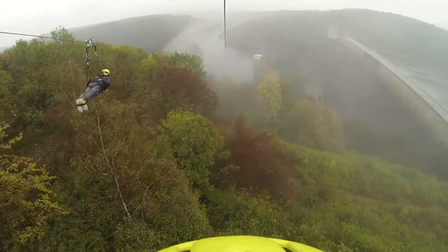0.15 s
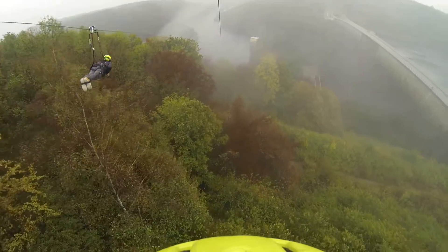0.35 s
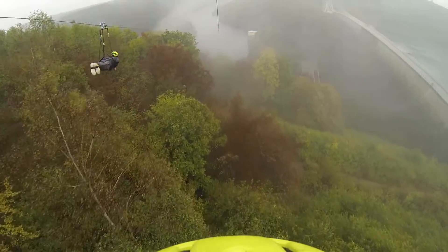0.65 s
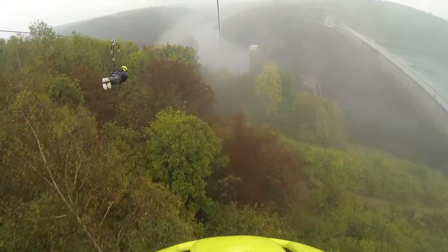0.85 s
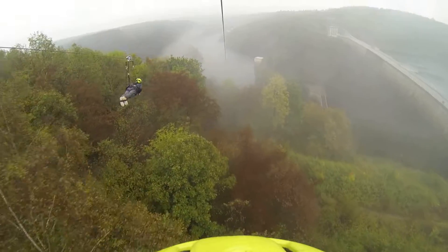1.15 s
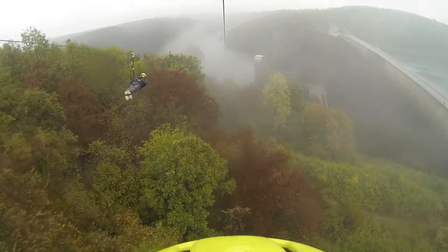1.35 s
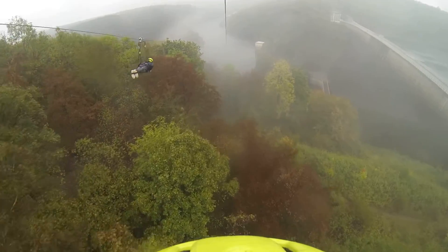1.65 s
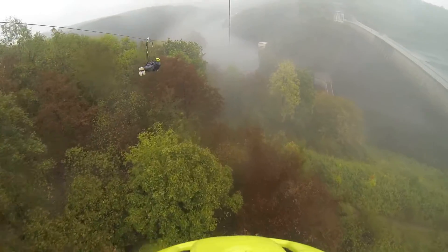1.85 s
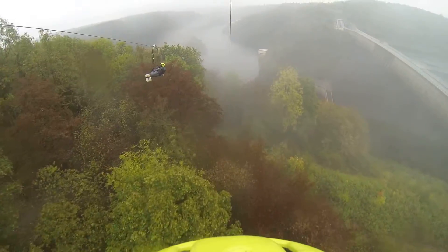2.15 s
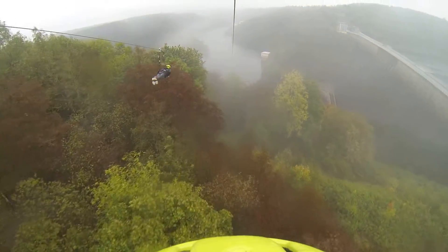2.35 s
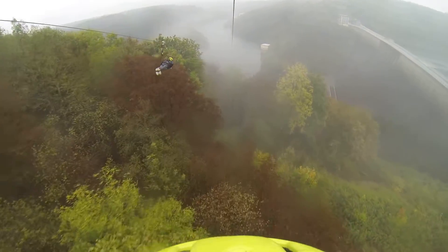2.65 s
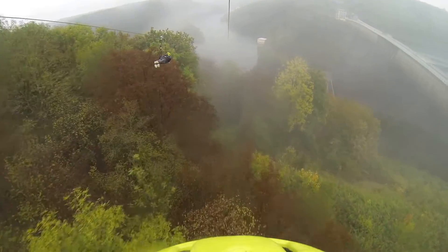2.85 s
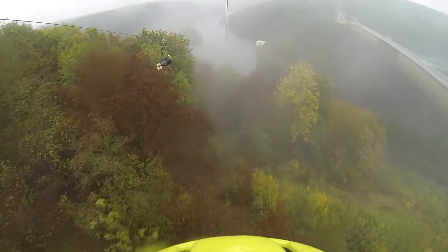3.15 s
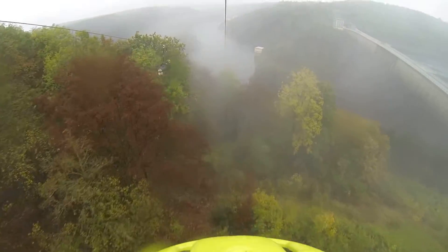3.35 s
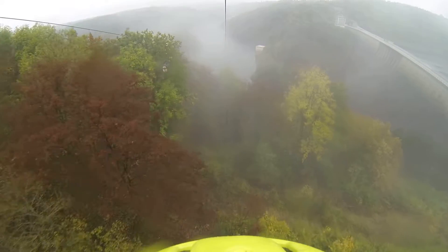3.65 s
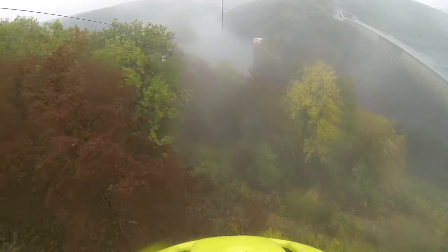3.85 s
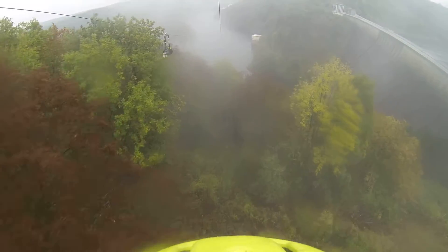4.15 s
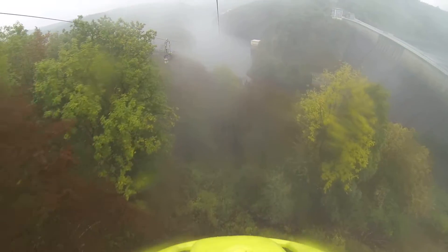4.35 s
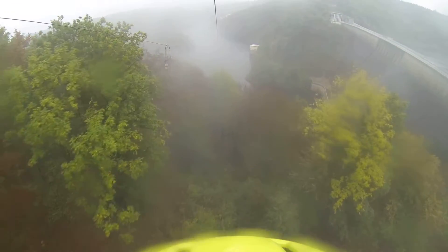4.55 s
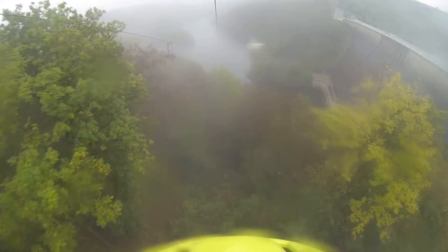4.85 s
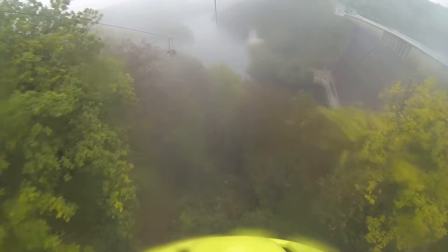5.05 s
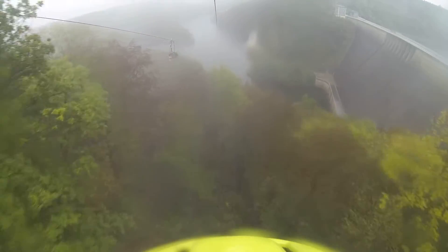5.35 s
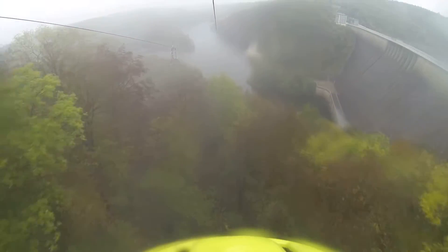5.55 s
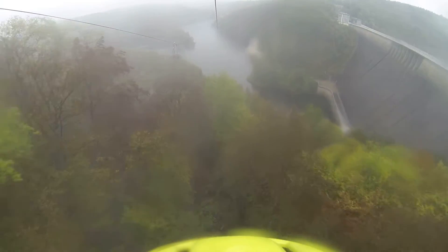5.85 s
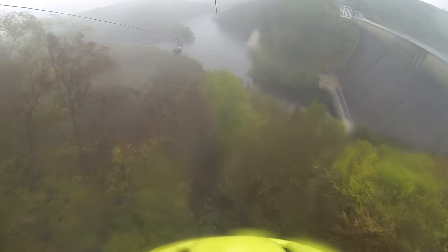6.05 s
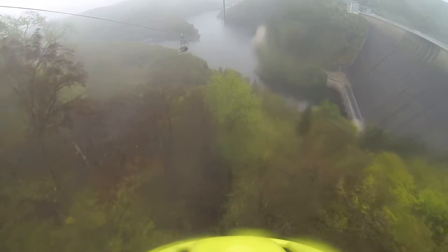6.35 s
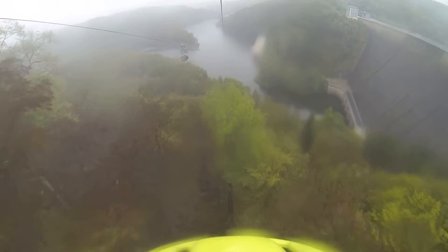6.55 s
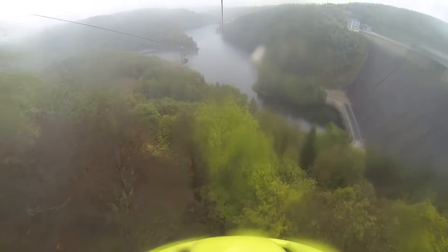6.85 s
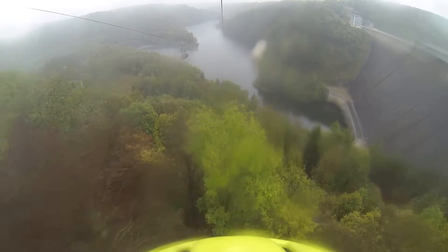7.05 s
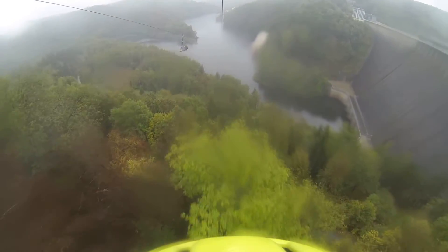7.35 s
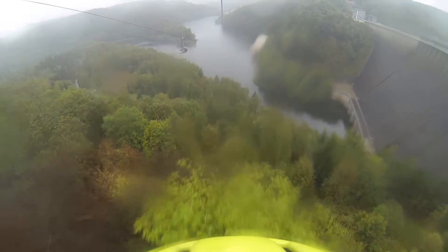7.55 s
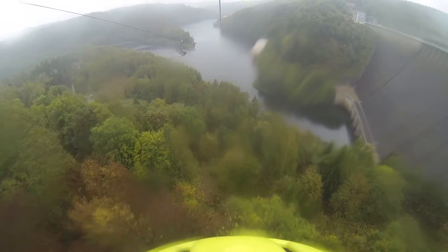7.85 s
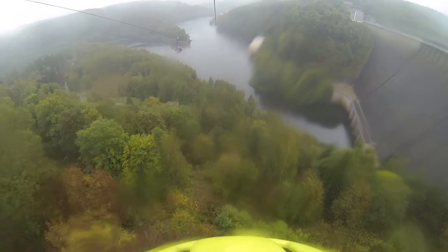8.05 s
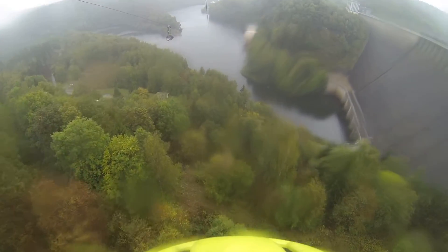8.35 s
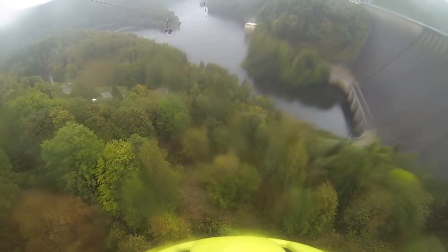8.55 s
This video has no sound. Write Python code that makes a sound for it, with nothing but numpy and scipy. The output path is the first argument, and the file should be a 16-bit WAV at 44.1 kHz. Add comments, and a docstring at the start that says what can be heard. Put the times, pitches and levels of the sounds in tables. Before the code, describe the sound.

A close zipline trolley speeds up with a climbing, raspy metallic whine, growing wind and light ticks of drizzle.

```python
"""A zipline trolley gathers speed down a steel wire rope, close to the mic of the rider's helmet camera.
The pulleys whine as they roll over the strands, and the rough contact hisses and keeps the trolley's
metal ringing; now and then a loose fitting chatters. Out in the open air, wind grows around the helmet
and drizzle ticks on the camera case. Farther off, a trolley on the next rope is soon out of earshot."""
import sys
import numpy as np
from scipy import signal
from scipy.fft import rfft, irfft, next_fast_len
from scipy.io import wavfile

SR = 44100
rng = np.random.default_rng(int(sys.argv[2]) if len(sys.argv) > 2 else 0)


def materialize(psi):
    """Save the field psi as 16-bit PCM at rate SR to the path in sys.argv[1].

    A 1-D psi becomes a single channel; in a 2-D psi each row is a channel.
    """
    bounded = np.clip(np.atleast_2d(psi).T, -1, 1)
    quanta = np.round(bounded * 32767).astype(np.int16)
    wavfile.write(sys.argv[1], SR, quanta)


N = 384111
TIME = np.arange(N) / SR

# speed, as strands passed a second: time_s, strand_hz
STRAND_RATE = [(0, 246.5), (0.36, 307), (0.64, 304), (0.9, 329.8), (1.42, 467.6), (2.03, 506.8),
               (2.47, 606.3), (2.72, 650.3), (3.18, 681.5), (3.62, 771), (3.85, 806), (4.25, 835.6),
               (4.85, 941.4), (5.46, 990.5), (5.9, 1078), (6.15, 1098), (6.54, 1122), (7.1, 1208),
               (7.58, 1234), (8.09, 1297), (8.71, 1324)]
# how each layer grows with speed: cruise_db, per_doubling_db, floor_db
PLATES_GROWTH = (-24, 18.4, -38)
PULLEYS_GROWTH = (-30, 7.35, -66)
FITTINGS_GROWTH = (-38.5, 5.5, -65.5)
RIMS_GROWTH = (-38.5, 9.6, -56)
HISS_GROWTH = (-25.5, 17.6, -46.5)
WHINE_GROWTH = (-26.5, 11.3, -46.5)
BUFFET_GROWTH = (-43, 17, -43)
DRONE_GROWTH = (-35.5, 9.6, -70)
RUSH_GROWTH = (-39, 18, -61.5)
# resonances of the trolley's metal: pitch_hz, width_hz, gain_db
PLATE_MODES = [(1236, 41, -17.5), (1510, 88, -15), (1727, 189, 4.5), (1872, 127, -3)]
FAST_PLATE_MODES = [(1597.5, 134, 0)]  # comes in with speed
PULLEY_MODES = [(3430, 340, -8), (3655, 174, 7), (3700, 100, -36)]
FITTING_MODES = [(2350, 170, 9.5), (2580, 110, 2.5), (2777, 91, 5), (3140, 1200, 0.5), (3970, 100, -27),
                 (4630, 150, -22), (4870, 190, 1), (5800, 160, -32)]
RIM_MODES = [(5640, 310, -12.5), (6876, 200, 5.5), (7067, 205, 9), (7350, 170, 0), (7945, 370, 1.5),
             (8180, 290, 1.5), (9000, 690, -3), (9870, 670, -5), (10900, 590, -10.5), (12300, 570, -17.5)]
LOOSE_FITTING_MODES = [(4830, 350, 1), (5620, 220, -7)]
# slow swells and dips: time_s, gain_db
ROLLING_SWELL = [(0, -1.5), (.6, -1), (.9, 1.5), (1.9, -1.5), (2.2, 1.5), (2.8, 1), (3.7, 1.5), (4.9, .5),
                 (5.3, 0.5), (5.7, 1), (6.45, -1.5), (6.66, 1), (6.76, -3), (7.1, 0), (8.0, -1),
                 (8.38, 0.2), (8.49, -2.7), (8.71, -1.7)]  # all the ringing and hiss
PULLEY_RING_SWELL = [(0, 1.5), (.8, -1.5), (1.2, 3.5), (1.9, 3.5), (2.4, 0.5), (2.65, 4.5), (3.4, 2),
                     (4.0, -2.5), (4.7, 4.5), (5.1, 2.5), (5.6, 3), (6.25, 2), (7.0, 3.5), (7.3, -4),
                     (7.7, 0.5), (8.71, 2)]
# slow drift of the treble: time_s, hiss_db, rims_db
TREBLE_DRIFT = [(0, 0.5, 0.5), (1.15, -1, -1), (2.2, -0.5, 0.5), (2.9, -4.5, 0), (3.5, -1, 2),
                (4.3, -1, 1.5), (5.0, -0.5, 0), (7.3, 1, 1), (7.9, 1, -2.5), (8.71, 0.5, 6.5)]
# spectra of the steel's hiss and the three wind layers: frequency_hz, density_db
HISS_SPECTRUM = [(700, -18.5), (1000, -21.5), (1300, -23), (2100, 0), (2550, 0), (2950, -3), (3400, 1),
                 (4300, 2), (4900, -7.5), (5300, -2.5), (6000, -6), (6350, -14.5), (8200, -16),
                 (10000, -17), (12000, -27.5), (13000, -40), (14000, -46), (15200, -55)]
BUFFET_SPECTRUM = [(8, -11), (22, 2), (45, 0.5), (65, -8), (100, -15), (200, -51.5)]
DRONE_SPECTRUM = [(40, -13), (65, -3), (100, 2.5), (120, -6), (145, -10.5), (220, -27.5), (400, -43)]
RUSH_SPECTRUM = [(60, -17), (150, 3.5), (240, 1.5), (310, 5), (420, -6.5), (560, -7.5), (645, -3.5),
                 (760, -11.5), (950, -14), (1150, -4), (1600, -43), (4000, -49)]
# the whine's harmonics, from the first up: gain_db, rasp_rad
WHINE_HARMONICS = [(2.5, 0), (2.5, 0.44), (1, 1), (-0.5, 0.92), (-6, 0.93), (-13.5, 1.6)]
# how well the trolley radiates a tone: frequency_hz, gain_db
RADIATION = [(320, -23), (370, -29), (500, -33.5), (600, -24.5), (680, -16.5), (810, -22), (940, -39),
             (1080, -30.5), (1240, -15.5), (1310, -23), (1430, -8), (1680, 0), (1900, -6.5), (2080, -17.5),
             (2400, -8), (2850, -12), (3480, -6), (3690, 1.5), (3950, -12), (4400, -33), (4900, -11),
             (6300, -37), (7000, -10), (8300, -14), (10500, -34)]
# stronger gusts at the helmet: peak_s, half_length_s, buffet_db, drone_db, rush_db
HELMET_GUSTS = [(0.502, 0.15, 6.5, -6, 2), (5.102, 0.73, 3.5, 0.5, 2.5), (5.72, .12, 6, -0.5, 1.5),
                (6.347, 0.22, -2, 3.5, 2), (7.215, 0.23, -1, 4.5, 0.5), (8.65, 0.089, 9, 0, -0.5)]
# the trolley ahead on the next rope: time_s, strand_hz, level_db
DISTANT_RUN = [(0, 362, -73), (.25, 400, -62), (.42, 427, -62), (.56, 431.6, -63), (.7, 462, -67),
               (.95, 473, -62), (1.1, 480, -67), (1.5, 524, -85)]
# big drops on the camera case: start_s, peak_db, low_cut_hz
BIG_DROPS = [(1.924, -26, 5500), (2.5215, -25, 4000), (3.355, -9.5, 3800), (3.4856, -13, 4800),
             (3.5197, -17, 4000), (3.8242, -21, 8500), (4.2935, -18, 10500), (4.9336, -11, 7500),
             (5.663, -3.5, 3800), (6.0476, -13, 9500), (6.596, -3, 4200), (6.7152, -3.5, 3800),
             (6.9395, -13, 8500), (7.0962, -6, 9500), (7.1423, -10, 5500), (7.4042, -14, 8500),
             (7.5378, -3.5, 5200), (8.488, -9, 8500), (8.535, -9, 7500)]
# resonances of the case: pitch_hz, gain_db, t60_s
CASE_MODES = [(4810, 12, 0.0085), (5700, 11.5, 0.0038), (7000, -0.5, 0.0089), (8050, 5, 0.0042),
              (8930, 7.5, 0.0041), (10800, 0, 0.0034), (13000, -2, .003), (14700, -27, 0.0027)]
# spells of chatter from a loose fitting: peak_s, half_length_s, level_db
CHATTER_SPELLS = [(1.75, 0.29, -44.5), (2.849, 0.34, -43), (3.95, .2, -45)]


def gain_of(db):
    """Decibels to amplitude."""
    return 10 ** (np.asarray(db) / 20)


def unit_rms(x):
    """Scales to rms 1."""
    return x / np.sqrt(np.mean(abs(x) ** 2) + 1e-20)


def curves(rows):
    """The columns of a table, joined by straight lines in time."""
    times, *columns = np.transpose(rows)
    return [np.interp(TIME, times, column) for column in columns]


def spectrum(points):
    """A spectrum as a gain for any frequency."""
    points_hz, db = np.transpose(points)
    return lambda hz: gain_of(np.interp(np.log(hz + 1), np.log(points_hz + 1), db))


def resonances(modes):
    """Steep-sided resonances as a gain for any frequency."""
    return lambda hz: np.sqrt(sum((gain_of(db) / (1 + ((hz - pitch) / (0.57 * width)) ** 2)) ** 2
                                  for pitch, width, db in modes))


def coloured(x, response):
    """Passes x through a frequency response; rms 1."""
    size = next_fast_len(N + 4096)
    gains = response(np.fft.rfftfreq(size, 1 / SR))
    return unit_rms(irfft(rfft(x, size) * gains, size)[:N])


def wander(per_s):
    """A random drift of rms 1, turning per_s times a second."""
    knots = rng.standard_normal(8192)
    return unit_rms(np.interp(TIME * per_s, np.arange(len(knots)), knots))


def surge(peak_s, half_s):
    """A smooth rise to 1 at peak_s and fall again."""
    return np.exp(-((TIME - peak_s) / half_s) ** 2)


def speed_db(growth, strand_hz, cruise_hz=1000):
    """A layer's level: it climbs from a floor, steadily with each doubling of speed."""
    cruise_db, per_doubling_db, floor_db = growth
    rising_db = cruise_db + per_doubling_db * np.log2(strand_hz / cruise_hz)
    return 20 * np.log10(np.hypot(gain_of(rising_db), gain_of(floor_db)))


def contact(cycles, strand_hz, strands=6, repeat=0.073, bumpiness=0.085, jitter_rad=0.4):
    """Roughness under the pulleys: noise, a pattern that returns with each rope twist, strand bumps."""
    twists = cycles / strands
    pattern = sum(wander(22) * np.cos(2 * np.pi * (k * twists + rng.random()))
                  for k in range(strands, 36))
    # uneven spacing smears the bumps' upper harmonics into bands that climb through the resonances
    angle = 2 * np.pi * cycles + jitter_rad * wander(170)
    bumps = sum(np.cos(k * angle + 2 * np.pi * rng.random()) for k in range(4, 20))
    rope = np.sqrt(repeat / strands) * pattern + np.sqrt(bumpiness) * bumps
    density = np.sqrt(4 * strand_hz / SR)  # holds the power per Hz as the harmonics spread
    return rng.standard_normal(N) + density * rope


def rolling(cycles, strand_hz, flutter_db=0.43, onset_hz=600):
    """The contact rings the side plates, the pulleys, their rims and the fittings around them."""
    pulley_swell_db, = curves(PULLEY_RING_SWELL)
    _, rim_drift_db = curves(TREBLE_DRIFT)
    drive = contact(cycles, strand_hz)
    fast_share = 0.53 / (1 + (onset_hz / strand_hz) ** 2)
    plates = np.sqrt(1 - fast_share) * coloured(drive, resonances(PLATE_MODES))
    plates += np.sqrt(fast_share) * coloured(contact(cycles, strand_hz), resonances(FAST_PLATE_MODES))
    pulleys = coloured(drive, resonances(PULLEY_MODES))
    fittings = coloured(contact(cycles, strand_hz), resonances(FITTING_MODES))
    sound = gain_of(speed_db(PLATES_GROWTH, strand_hz)) * plates
    sound += gain_of(speed_db(PULLEYS_GROWTH, strand_hz) + pulley_swell_db) * pulleys
    sound += gain_of(speed_db(FITTINGS_GROWTH, strand_hz)) * fittings
    sound += gain_of(speed_db(RIMS_GROWTH, strand_hz) + rim_drift_db) * rims(drive)
    return sound * gain_of(flutter_db * wander(25))


def rims(drive, sway_db=2.2):
    """The high rim modes take turns to swell as the contact shifts in the groove."""
    return unit_rms(sum(gain_of(db + sway_db * wander(5)) * ring(drive, hz, width)
                        for hz, width, db in RIM_MODES))


def ring(drive, hz, width):
    """A resonance whose pitch sways a little: shift it down to zero, smooth twice, shift back."""
    carrier = np.exp(2j * np.pi * np.cumsum(hz * (1 + .005 * wander(3))) / SR)
    pole = np.exp(-np.pi * 1.5 * width / SR)
    smoothed = signal.lfilter([(1 - pole) ** 2], [1, -2 * pole, pole * pole], drive / carrier)
    return (carrier * smoothed).real


def hiss(cycles, strand_hz, flutter_db=0.84, top_hz=11000, open_strand_hz=620):
    """Fine roughness hisses, steel on steel; its top opens up with speed."""
    noise = coloured(contact(cycles, strand_hz), spectrum(HISS_SPECTRUM))
    dull = signal.sosfiltfilt(signal.butter(3, top_hz, fs=SR, output="sos"), noise)
    brightness = np.minimum(strand_hz / open_strand_hz, 1) ** 2
    drift_db, _ = curves(TREBLE_DRIFT)
    level_db = speed_db(HISS_GROWTH, strand_hz) + drift_db + flutter_db * wander(120)
    return gain_of(level_db) * (dull + brightness * (noise - dull))


def whine(cycles, strand_hz, shimmer=0.15, ring_hz=3690, lock_hz=130, steadying=.62, squeal_db=1):
    """Each strand bumps the pulleys; rasping harmonics steady into a squeal at the pulleys' ring."""
    jitter_rad = 0.2 * wander(60)
    sound = np.zeros(N)
    for k, (db, rasp_rad) in enumerate(WHINE_HARMONICS, 1):
        hz = k * strand_hz
        lock = 1 / (1 + ((hz - ring_hz) / lock_hz) ** 4)  # 1 on the ring, half at lock_hz away
        slip = k * jitter_rad + rasp_rad * wander(130)
        tone = np.cos(2 * np.pi * k * cycles + (1 - steadying * lock) * slip)
        tone = unit_rms((1 + shimmer * wander(70)) * tone)
        radiated = spectrum(RADIATION)(hz)  # each harmonic swells and fades as it climbs
        sound += gain_of(db + squeal_db * lock) * radiated * tone
    return gain_of(speed_db(WHINE_GROWTH, strand_hz)) * sound


def wind(strand_hz, gust_db=1.3, rush_gust_db=0.83):
    """Air around the helmet, right at the mic: low buffeting, a hollow drone and a rush share gusts."""
    gust = wander(7.9)
    buffet_db, drone_db, rush_db = sum(np.outer(db, surge(peak_s, half_s))
                                       for peak_s, half_s, *db in HELMET_GUSTS)

    def air(growth, shape, lift_db):
        noise = coloured(rng.standard_normal(N), spectrum(shape))
        return gain_of(speed_db(growth, strand_hz) + lift_db) * noise

    buffet = air(BUFFET_GROWTH, BUFFET_SPECTRUM, buffet_db + gust_db * gust)
    drone = air(DRONE_GROWTH, DRONE_SPECTRUM, drone_db + gust_db * gust)
    rush = air(RUSH_GROWTH, RUSH_SPECTRUM, rush_db + rush_gust_db * gust)
    return buffet + drone + rush


def distant_trolley(octave_db=-6, jitter_rad=0.85):
    """The faint whine of the trolley ahead on the next rope, with its octave."""
    hz, db = curves(DISTANT_RUN)
    angle = 2 * np.pi * np.cumsum(hz) / SR + jitter_rad * wander(45)
    return gain_of(db) * unit_rms(np.cos(angle) + gain_of(octave_db) * np.cos(2 * angle))


def drizzle(strand_hz, fine_count=300, fine_db=-12, spread_db=3):
    """A few big drops tick on the camera case, among many fine ones that land harder with speed."""
    sound = np.zeros(N)
    for start_s, peak_db, low_cut_hz in BIG_DROPS:
        add(sound, start_s, gain_of(peak_db) * drop_tick(low_cut_hz))
    pace_db = speed_db(HISS_GROWTH, strand_hz)  # fine drops grow as the hiss does
    for at in rng.integers(0, N, fine_count):
        peak_db = pace_db[at] + fine_db + spread_db * min(rng.exponential(), 3)
        add(sound, at / SR, gain_of(peak_db) * drop_tick(low_cut_hz=11500))
    return sound


def drop_tick(low_cut_hz):
    """A drop rings the case, a little differently at each spot; small ones miss the low modes. Peak 1."""
    t = np.arange(1024) / SR
    hz, db, t60 = np.transpose(CASE_MODES)[:, :, None]
    hz = hz * rng.uniform(.97, 1.03, hz.shape)
    weight = rng.choice([-1, 1], hz.shape) / np.hypot(1, (low_cut_hz / hz) ** 5)
    sound = (weight * gain_of(db - 60 * t / t60) * np.sin(2 * np.pi * hz * t)).sum(0)
    return sound / abs(sound).max()


def add(mix, start_s, sound):
    """Mixes a sound in at start_s."""
    part = mix[round(start_s * SR):][:len(sound)]
    part += sound[:len(part)]


def chatter(cycles, strand_hz):
    """Now and then a loose fitting adds a bright sizzle."""
    strength = sum(gain_of(db) * surge(peak_s, half_s) for peak_s, half_s, db in CHATTER_SPELLS)
    return strength * coloured(contact(cycles, strand_hz), resonances(LOOSE_FITTING_MODES))


def scene():
    """Trolleys, wind and drizzle in open air, heard in mono from the helmet as the speed builds."""
    strand_hz, = curves(STRAND_RATE)
    swell_db, = curves(ROLLING_SWELL)
    cycles = np.cumsum(strand_hz) / SR  # strands passed so far
    trolley = gain_of(swell_db) * (rolling(cycles, strand_hz) + hiss(cycles, strand_hz))
    trolley += whine(cycles, strand_hz) + chatter(cycles, strand_hz)
    return (trolley + distant_trolley() + wind(strand_hz) + drizzle(strand_hz))[None]


def record(dry):
    """The helmet camera cuts the treble above 15.4 kHz."""
    lowpass = signal.firwin(255, 15400, window=("kaiser", 9), fs=SR)
    return signal.oaconvolve(dry, lowpass[None], "same")


dry = scene()
out = record(dry)
materialize(out)
```